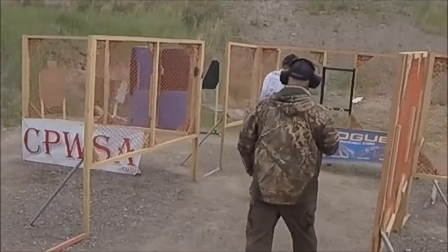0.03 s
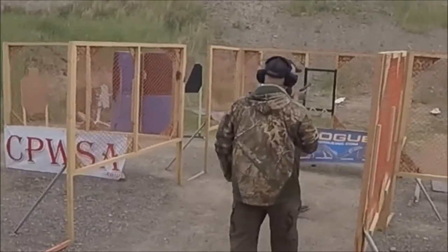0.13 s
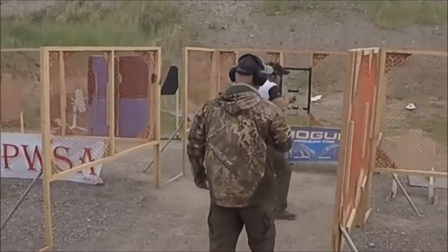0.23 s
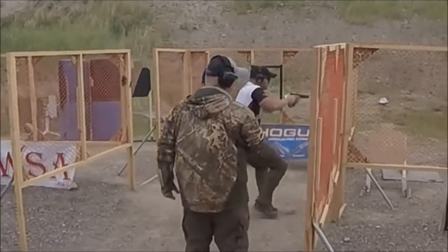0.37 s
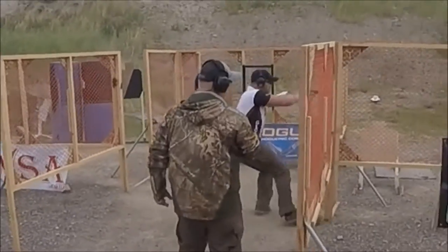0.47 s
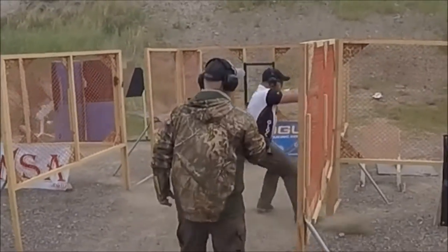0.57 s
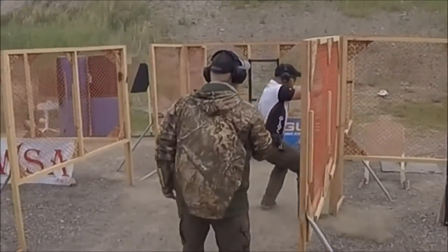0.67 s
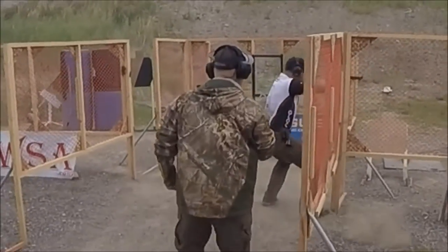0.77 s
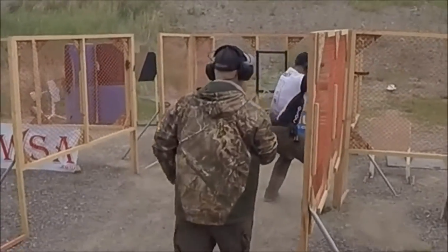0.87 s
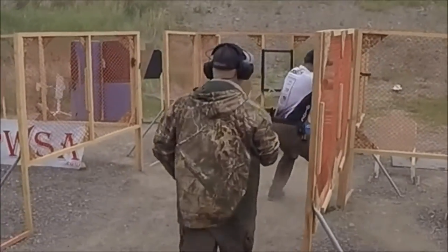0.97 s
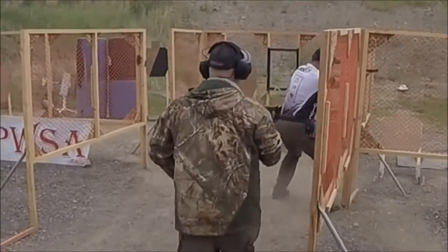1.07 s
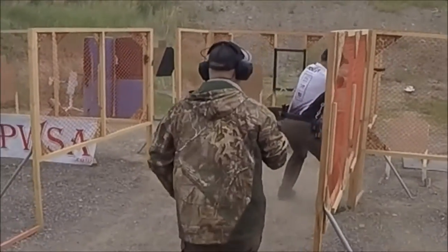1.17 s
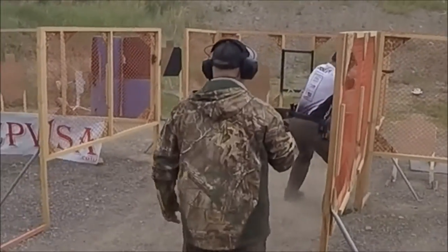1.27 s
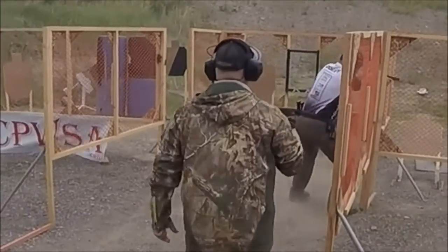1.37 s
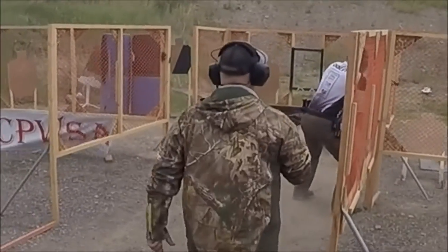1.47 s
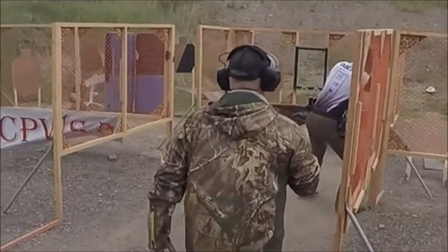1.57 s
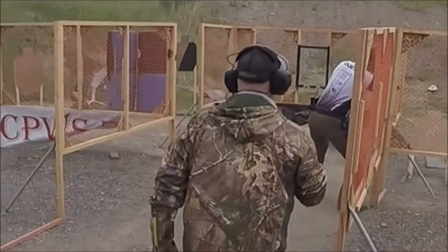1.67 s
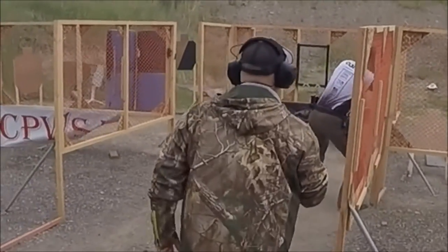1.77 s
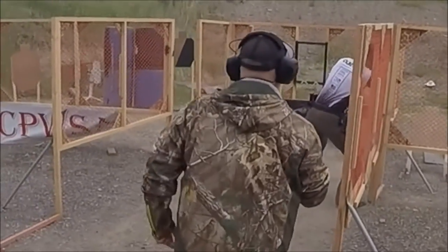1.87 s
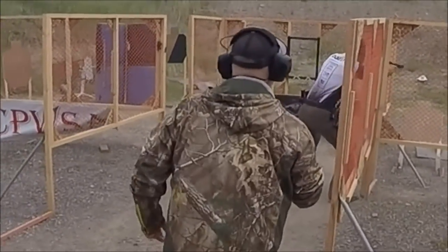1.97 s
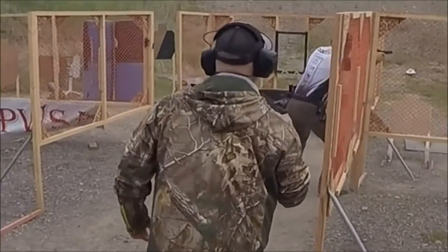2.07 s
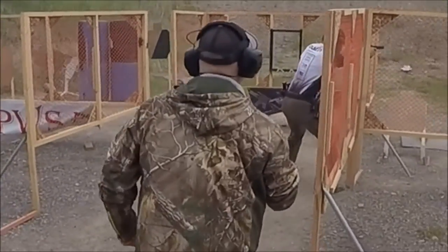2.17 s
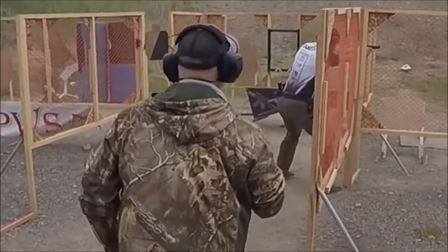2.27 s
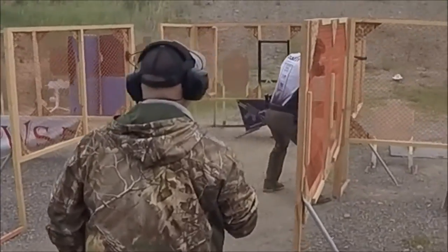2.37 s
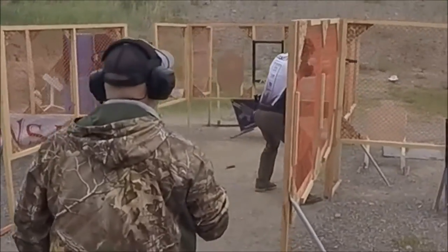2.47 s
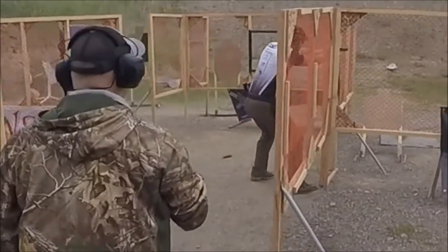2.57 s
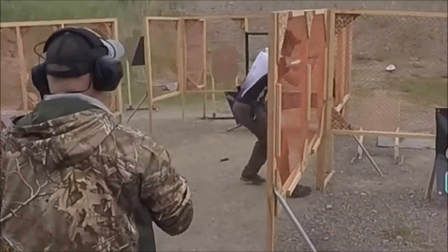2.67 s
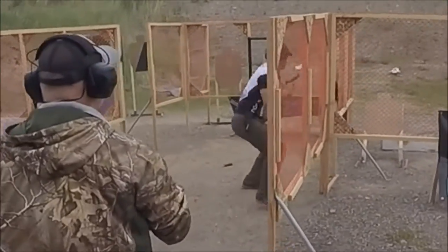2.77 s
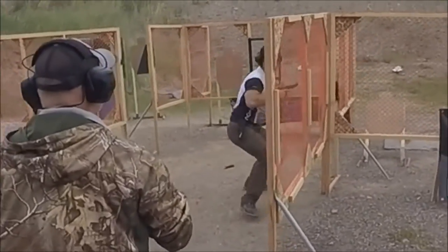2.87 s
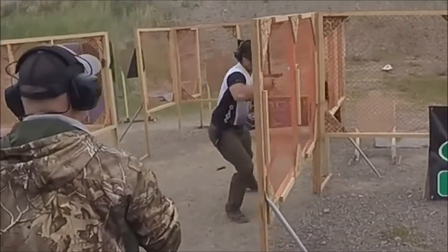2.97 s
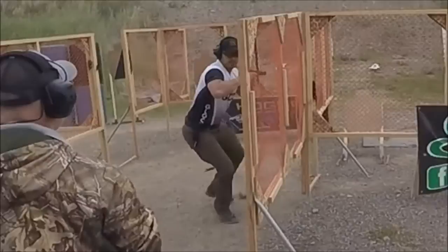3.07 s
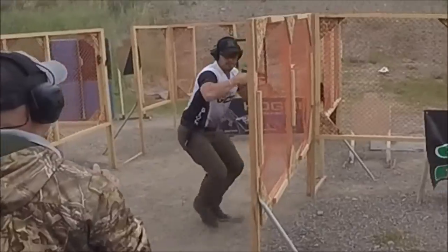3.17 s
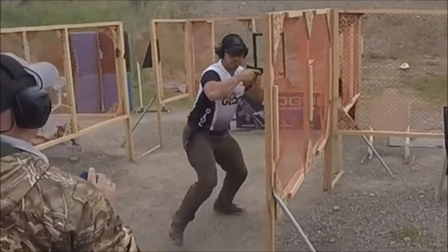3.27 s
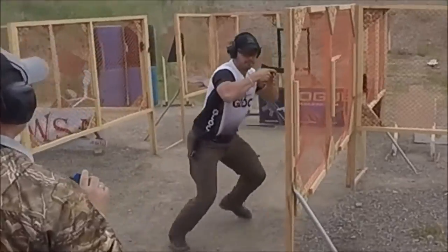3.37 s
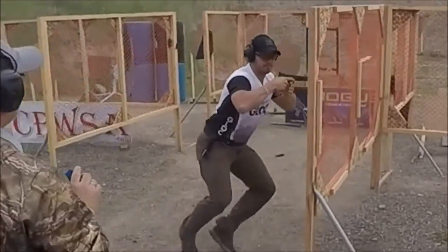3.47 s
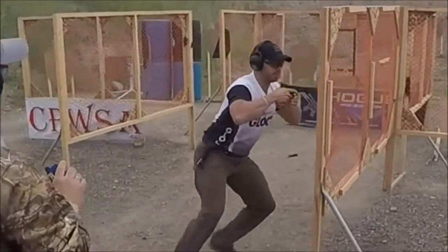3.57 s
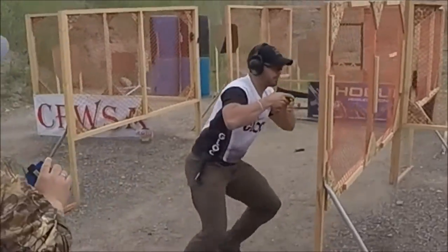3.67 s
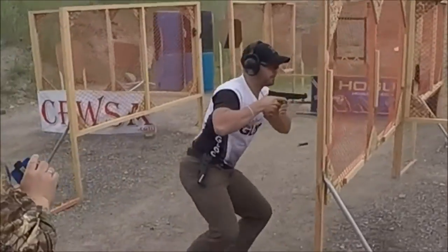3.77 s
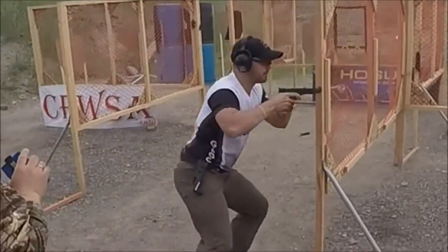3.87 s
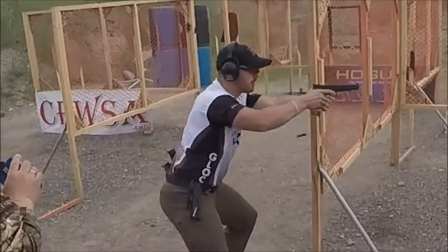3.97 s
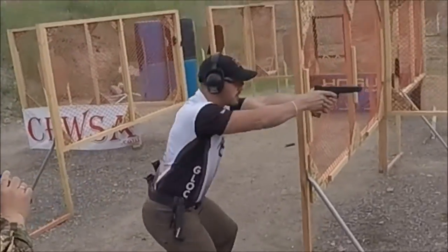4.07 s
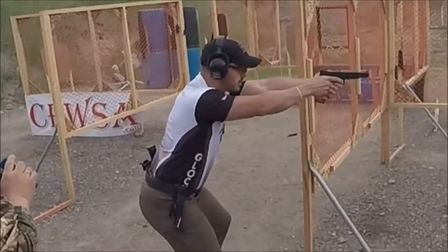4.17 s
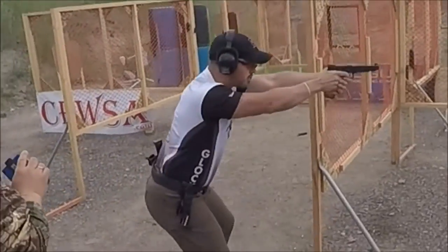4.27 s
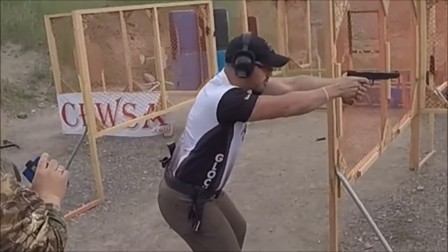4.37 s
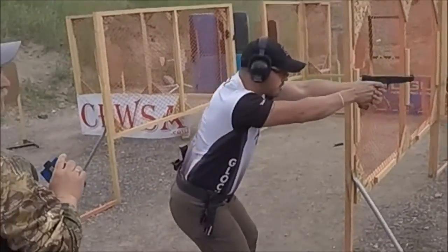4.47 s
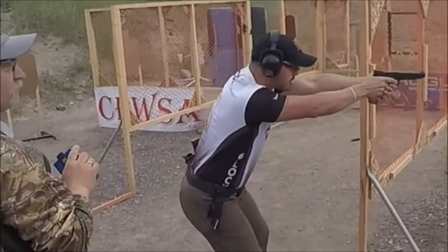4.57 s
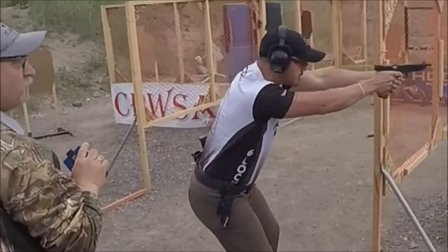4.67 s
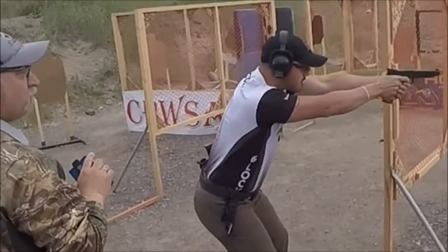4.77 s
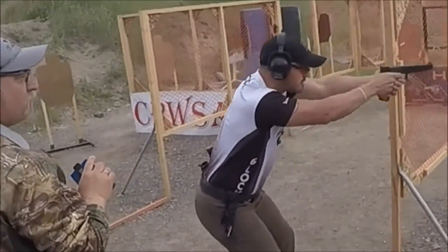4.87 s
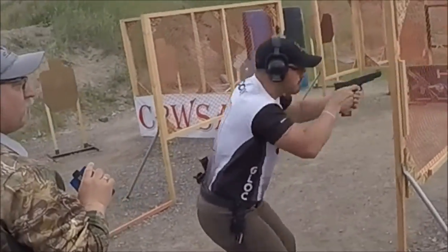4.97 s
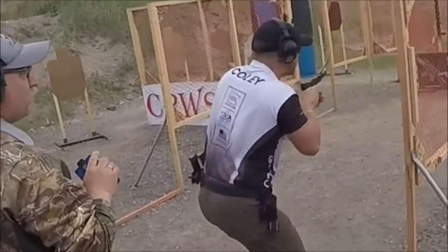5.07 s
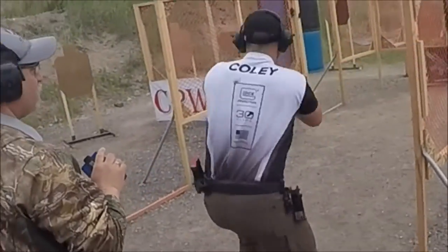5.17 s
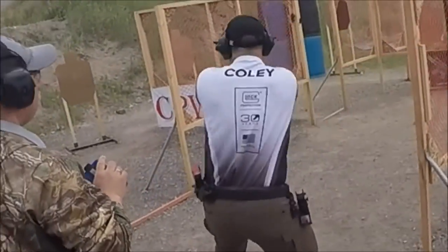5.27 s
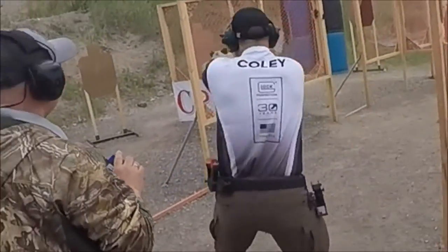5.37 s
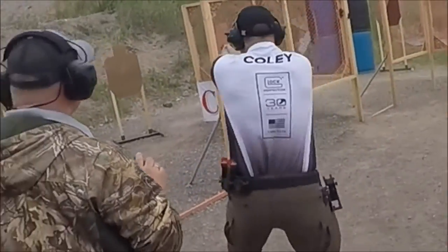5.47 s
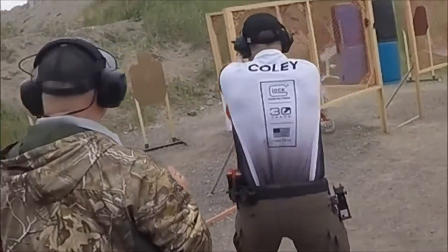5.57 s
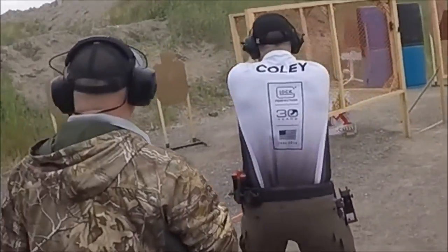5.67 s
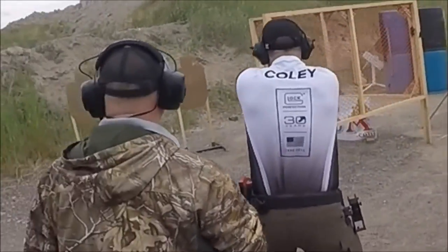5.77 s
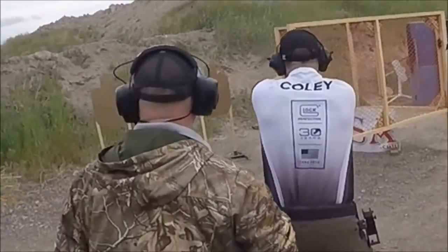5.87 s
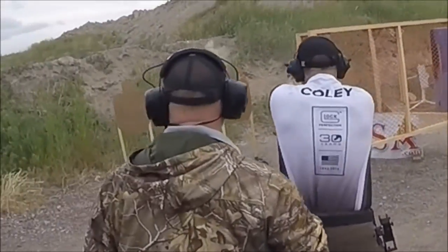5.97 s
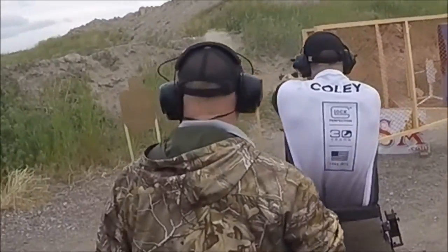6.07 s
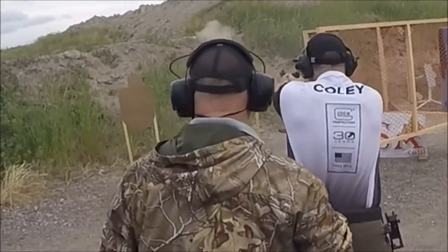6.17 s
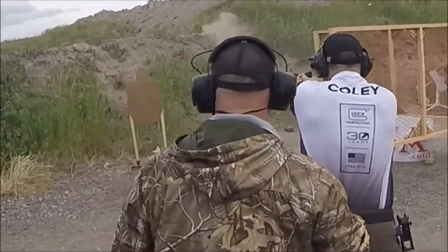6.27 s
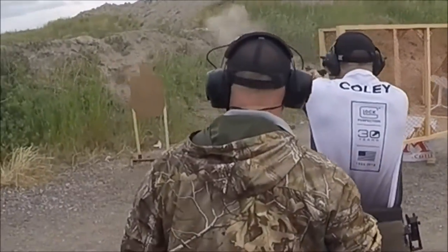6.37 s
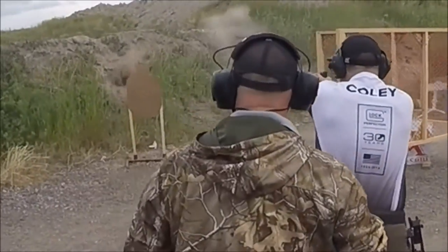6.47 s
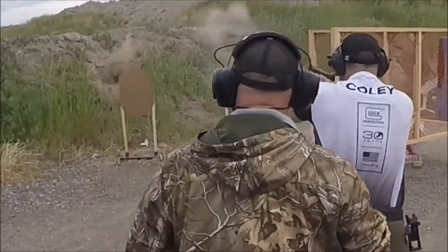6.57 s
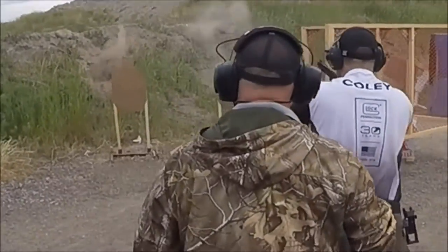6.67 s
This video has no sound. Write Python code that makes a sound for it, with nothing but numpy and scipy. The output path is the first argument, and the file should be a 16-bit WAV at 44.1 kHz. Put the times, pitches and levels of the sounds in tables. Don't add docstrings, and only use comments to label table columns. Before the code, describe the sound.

In an open gravel bay with board walls and earth banks, low wind rumble and gritty steps lead into harsh, overloading pistol fire: three shots, two pairs, then after a gusty lull two volleys of four. Short dull echoes crowd each crack, and a thin tail rolls off the hills. Background hiss and wind sink after each shot and creep back; tiny brass cases ring on stones.

```python
import sys
import numpy as np
from scipy import signal
from scipy.fft import rfft, irfft
from scipy.io import wavfile
from scipy.ndimage import uniform_filter1d

SR = 44100
rng = np.random.default_rng(int(sys.argv[2]) if len(sys.argv) > 2 else 0)


def dump_mix(stems):
    frames = np.atleast_2d(stems).T
    limited = np.clip(frames, -1, 1)
    pcm = np.round(limited * 32767).astype(np.int16)
    wavfile.write(sys.argv[1], SR, pcm)


def elevation(decibels):
    levels = np.asarray(decibels, float)
    return 10 ** (levels / 20)


N = 297230


def rms_one(x):
    return x / np.sqrt(np.mean(x ** 2) + 1e-20)


def peak_one(x):
    return x / np.max(np.abs(x))


def colour(x, spectrum):
    hz, level_db = np.transpose(spectrum)
    grid = np.fft.rfftfreq(8192, 1 / SR) + 1
    cepstrum = irfft(np.log(elevation(np.interp(np.log(grid), np.log(hz), level_db))))
    cepstrum[1:4096] *= 2
    cepstrum[4097:] = 0
    response = irfft(np.exp(rfft(cepstrum)))
    return signal.fftconvolve(x, response / np.sqrt(np.sum(response ** 2)))[:len(x)]


def drift(rate, size):
    r = np.exp(-2 * np.pi * rate / SR)
    walk = signal.lfilter([1], [1, -2 * r, r * r], rng.standard_normal(size + 9000))
    return rms_one(walk[9000:])


def low_pass(x, hz):
    return signal.sosfilt(signal.butter(4, np.clip(hz, 50, 19000), fs=SR, output="sos"), x)


def add(track, s, sound):
    at = round(s * SR)
    track[at:at + len(sound)] += sound[:N - at]


def swell(s, spread):
    return np.exp(-((np.arange(N) / SR - s) / spread) ** 2)


# (time [s], strength [dB], turbulence [dB])
GUSTS = [(0, -27.5, 1.5), (.28, -29.5, -12), (.56, -23, -3.5), (.95, -41, 12), (1.452, -52, 2.5),
         (1.97, -38, 7), (2.14, -26.5, -3), (2.97, -28, -1.5), (3.07, -40, 3), (3.6, -37, 0),
         (3.7, -23, -14), (3.82, -20, 2.5), (4.198, -9.5, 3), (4.62, -23, -10.5), (4.95, -44, 12.5),
         (5.26, -31.5, 3.5), (5.57, -30.5, 14.5), (5.85, -40.5, 2.5)]
# (frequency [Hz], density [dB])
RUMBLE_SPECTRUM = [(8.8, -13.5), (15, 8), (57, 6.5), (300, -20.5), (390, -63.5), (660, -120)]
BUFFET_SPECTRUM = [(71, -37), (120, -0.5), (189, -6), (334, -10), (371, -10.5), (520, -19.5), (680, -37.5),
                   (1140, -120)]
WHOOSH_SPECTRUM = [(260, -24.5), (450, -4), (534, -1), (587, -5), (910, -2.5), (1390, -23.5), (1470, -26),
                   (2040, -27.5), (2660, -30), (3500, -42.5), (5200, -47.5), (7700, -79.5)]
# (time [s], peak level [dB])
EDDY_POPS = [(2.113, -24.5), (2.294, -33), (3.671, -45), (3.807, -14), (3.846, -9), (3.975, -14),
             (4.101, -5), (4.179, -9), (4.282, -3), (5.233, -27), (5.293, -28)]


def wind(since, step_db):
    s, strength_db, roughness_db = np.transpose(GUSTS)
    t = np.arange(N) / SR
    gust_db, turbulence_db = np.interp(t, s, strength_db), np.interp(t, s, roughness_db)
    above_mean_db = gust_db + 26.5
    duck_db = uniform_filter1d(5 * np.exp(-since / 0.19), size=400)
    ambience_db = -57.5 - 36.5 * np.exp(-since / 0.25)
    rumble_db = gust_db - duck_db
    buffet_db = -41 + 1.555 * above_mean_db + turbulence_db - duck_db
    whoosh_db = -55.5 + 2.094 * above_mean_db + turbulence_db - duck_db
    whoosh_level = elevation(whoosh_db) + elevation(ambience_db) + elevation(step_db + 6.5)

    lumps_db, flicker = 2.0 * drift(24, size=N), drift(83, size=N)
    rumble = rms_one(colour(rng.standard_normal(N), RUMBLE_SPECTRUM) * elevation(lumps_db))
    buffet = rms_one(colour(rng.standard_normal(N) * elevation(lumps_db + 0.82 * flicker), BUFFET_SPECTRUM))
    whoosh = rms_one(colour(rng.standard_normal(N) * elevation(lumps_db + 2.8 * flicker), WHOOSH_SPECTRUM))
    out = elevation(rumble_db) * rumble + elevation(buffet_db) * buffet + whoosh_level * whoosh

    t = np.arange(SR // 20) / SR
    pop = np.cos(2 * np.pi * 160 * t) * np.exp(-t / 0.0044) * np.minimum(t / 0.00026, 1)
    pop = low_pass(pop, 1000)
    for s, peak_db in EDDY_POPS:
        add(out, s, elevation(peak_db) * pop)
    return out


# (time [s], level [dB], spread [s])
STEPS_ON_GRAVEL = [(0, -52.5, 0.057), (.42, -56.5, 0.063), (.49, -47, 0.026), (.57, -53.5, 0.057),
                   (.75, -62.5, 0.14), (2.07, -56.5, 0.072), (2.33, -56, 0.042), (2.799, -57.5, 0.15),
                   (3.11, -70, 0.0097), (3.29, -60, 0.023), (3.429, -62.5, 0.044), (3.58, -60, 0.04),
                   (3.83, -53.5, 0.17), (4.15, -51.5, .13), (4.42, -60.5, 0.073), (5.15, -67.5, 0.098),
                   (6.06, -65.5, 0.16), (6.6, -56, 0.068)]


def step_level():
    return 20 * np.log10(elevation(-72) + sum(elevation(db) * swell(s, spread) for s, db, spread in STEPS_ON_GRAVEL))


# (frequency [Hz], density [dB])
GRAVEL_SPECTRUM = [(710, -33), (1200, -1), (1660, -4), (2110, -3), (2890, -10.5), (5180, -18), (6580, -19),
                   (14700, -41), (15500, -39), (16000, -51.5)]


def gravel(step_db):
    grain_db, grains_per_s = 3.0, 7000
    sizes = elevation(grain_db * np.minimum(rng.exponential(1, N), 5)) * rng.choice([-1, 1], N)
    chance = grains_per_s * elevation(grain_db * drift(20, size=N)) / SR
    grains = sizes * (rng.random(N) < chance)
    return elevation(step_db) * rms_one(colour(grains, GRAVEL_SPECTRUM))


def electronics(since):
    whine_hz, wide_open_s, returns_db_per_s = 12620, 1.7, 18
    hiss = rms_one(np.diff(rng.standard_normal(N + 1)) * elevation(3.1 * drift(15, size=N)))
    whine = np.sin(2 * np.pi * whine_hz * np.arange(N) / SR)
    level_db = -79.5 - returns_db_per_s * np.maximum(wide_open_s - since, 0)
    return elevation(level_db) * (whine + elevation(4) * hiss)


# (time [s], peak level [dB], length [s])
STONES_AND_SCUFFS = [(0.0074, -35, 0.01), (0.1726, -37, 0.023), (0.199, -31.5, 0.013), (0.226, -41, 0.012),
                     (0.23, -50, 0.061), (0.352, -48, 0.021), (0.387, -38, 0.01), (0.404, -48, 0.011),
                     (0.472, -50, 0.022), (0.477, -42, 0.0065), (0.502, -54, 0.0089), (0.607, -69, 0.014),
                     (0.653, -43, 0.012), (1.6544, -53, 0.011), (2.311, -40.5, 0.0074),
                     (3.108, -55.5, 0.0081), (3.2394, -54, 0.011), (3.277, -50, 0.014),
                     (3.412, -56.5, 0.016), (3.533, -61.5, 0.017), (3.587, -42.5, 0.0088),
                     (3.672, -52, 0.013), (3.72, -42, 0.011), (3.734, -48, 0.01), (3.894, -38.5, 0.0091),
                     (4.013, -42, 0.015), (4.161, -31.5, 0.02), (4.213, -34, 0.01), (5.642, -53.5, 0.012),
                     (6.627, -46.5, 0.0099)]
# (frequency [Hz], density [dB])
SCUFF_SPECTRUM = [(470, -37.5), (800, 3), (2070, -15), (4080, -14), (5180, -13.5), (7360, -24.5),
                  (7930, -28), (14500, -33.5), (15400, -30.5), (16000, -41)]


def stones():
    out, t = np.zeros(N), np.arange(SR // 4) / SR
    for s, peak_db, length in STONES_AND_SCUFFS:
        scrape = rng.standard_normal(len(t)) * np.exp(-t / length) * np.minimum(t / 0.0065, 1)
        add(out, s, elevation(peak_db - 2.5) * colour(scrape, SCUFF_SPECTRUM))
    return out


# (time [s], pitch [Hz], level [dB], 60 dB decay [s])
BRASS_CASES = [(.525, 7100, -62, .06), (.545, 7600, -58, .05), (0.589, 11100, -58, 0.15),
               (0.649, 11500, -59, .1), (3.07, 8050, -70.5, 0.11), (3.64, 9000, -66, 0.051),
               (3.76, 11400, -66, .08), (3.86, 13900, -60, .06), (3.97, 11500, -61, .1),
               (3.99, 13800, -58, 0.12), (3.99, 7600, -62, .08), (4.132, 11800, -54, .25),
               (5.46, 7430, -67.5, .06), (5.50, 7650, -69, .06), (5.649, 7750, -67.5, .07)]


def brass():
    out, t = np.zeros(N), np.arange(SR // 4) / SR
    beat = 1 + .5 * np.sin(2 * np.pi * 45 * t)
    for s, hz, level_db, t60 in BRASS_CASES:
        ring = np.sin(2 * np.pi * hz * t) * beat * np.minimum(t / 0.0049, 1)
        add(out, s, elevation(level_db - 60 * t / t60) * ring)
    return out


# (time [s], wall echo [dB], overload [dB], near scatter [dB], low swing [dB])
PISTOL_SHOTS = [(0.711, 6, 7.5, -5.5, 1.5), (0.883, -8, 4, -11, -9), (1.128, 0.5, 1, -13, -20.5),
                (1.697, -1.5, 6, -8, -20), (1.87, -3, 2, -9.5, -20), (2.39, -1.5, 6, -9, -11.5),
                (2.611, -4.5, 9.5, -8.5, -24.5), (4.313, 6, 11, -3, -21), (4.505, 3, 6, -9, 0),
                (4.739, -1.5, 3.5, -12, -8.5), (4.926, -1.5, 2.5, -12, -17.5), (5.727, 6.5, 7, -7.5, -32),
                (5.947, 3, 5, -9.5, -16), (6.233, 3, 5.5, -9.5, -18.5), (6.449, 3, 4, -10.5, -23)]
# (frequency [Hz], density [dB])
NEAR_SPECTRUM = [(59, -32), (100, -3.5), (308, -4), (595, -4), (872, 1), (1010, -5), (1310, -13),
                 (1760, -13.5), (2270, -10), (3400, -23), (5080, -18.5), (6020, -31), (6840, -27.5),
                 (14100, -45.5), (16000, -57.5)]


def lead_in():
    out, length_s = np.zeros(N), .003
    for shot in PISTOL_SHOTS:
        noise = rng.standard_normal(round(length_s * SR))
        add(out, shot[0] - length_s, elevation(-33) * colour(noise, NEAR_SPECTRUM))
    return out


def housing(x):
    ring_hz, width_hz = 720, 380
    r = np.exp(-np.pi * width_hz / SR)
    return peak_one(signal.lfilter([1, 0, -1], [1, -2 * r * np.cos(2 * np.pi * ring_hz / SR), r * r], x))


# (frequency [Hz], density [dB])
BLAST_SPECTRUM = [(35, -27), (60, -7), (924, 6), (2050, -6.5), (2470, -7.5), (3120, -20), (5090, -18.5),
                  (7400, -40), (10000, -49.5), (10800, -50), (12700, -53), (13600, -51), (16000, -56.5)]


def blast(t, puff):
    crack_s, ball_s, ball_width_s = .0012, .0021, .00024
    growth = (t / crack_s) ** 2
    crack = signal.lfilter([1, -1], [1], puff[0]) * growth * np.exp(-growth)
    ball = np.exp(-((t - ball_s) / ball_width_s) ** 2) + 0.054 * puff[1] * np.exp(-t / 0.001)
    thump = 0.04 * peak_one(low_pass(ball, 430))
    ringing = peak_one(peak_one(colour(ball, BLAST_SPECTRUM)) + housing(ball) + thump)
    return elevation(-1.5) * peak_one(colour(crack, BLAST_SPECTRUM)) + ringing


def dying(noise, t, spectrum, t60):
    body = colour(noise, spectrum)
    bass = low_pass(body, 7800)
    return (bass + (body - bass) * elevation(-16 * t)) * elevation(-60 * t / t60)


SHOT_SPOT = [0, 0, 0, 1, 1, 2, 2, 3, 3, 3, 3, 4, 4, 4, 4]
SWING_SIGN = [-1, 1, 1, 1, 1, 1, 1, 1, 1, 1, 1, 1, 1, 1, 1]
# (delay [s], level [dB], dulled above [Hz], share ringing in the housing [0-1])
SPOT_ECHOES = [
    [(.0030, -3, 6000, 0.5), (.0240, -5.5, 1430, 0.5), (.0285, -6.5, 1477, 0), (.093, -27, 8800, 0),
     (.183, -34, 9170, 0), (.217, -43, 9200, 0.5)],
    [(.0020, -6.5, 5770, 0.6), (.0205, -6, 6830, 0), (.0225, 1, 1230, 0.9), (.0275, -15, 6000, .5),
     (.038, -11, 6040, 0), (.093, -22, 9000, .1), (.195, -34, 7040, .1)],
    [(.0030, -12, 6400, 0), (.0230, 5, 1520, 0.1), (.0280, -2, 4900, .5), (.0395, -2, 1187, 0.4),
     (.093, -18, 9000, 0)],
    [(.0041, -2, 7120, .1), (.0200, -1.5, 895, .2), (.017, -16.5, 8000, .1), (.040, -14, 1990, 0.6),
     (.094, -57, 9250, 0.4), (.186, -39, 9100, .1)],
    [(.0040, -3, 5200, 0), (.0324, 2, 1100, 0.7), (.054, -17, 6340, 0), (.056, -28.5, 265, .02),
     (.112, -36.5, 7100, .1), (.182, -33.5, 9000, 0)],
]
# (last wall [s], drop after it [dB], scatter 60 dB decay [s])
SPOT_BAY = [
    (0.038, -3, 0.21),
    (0.054, 0, 0.21),
    (0.046, -9, 0.27),
    (0.033, 0.5, 0.16),
    (0.069, -3, 0.23),
]
# (far tail [dB], hill answer delay [s], hill answer [dB], its spread [s])
SPOT_LAND = [
    (-34, .2, -51.5, 0.067),
    (-30.5, 0.16, -41, .06),
    (-27, 0.19, -50, 0.042),
    (-38, 0.21, -47.5, 0.014),
    (-32.5, 0.19, -50, 0.07),
]
# (frequency [Hz], density [dB])
FAR_SPECTRUM = [(88, -47.5), (150, -9.5), (254, 0), (328, -5.5), (524, -4.5), (790, -1.5), (1080, -12),
                (1450, -10), (1760, -13), (2140, -9.5), (3420, -20), (4860, -13), (5910, -20.5),
                (13700, -39), (16000, -77.5)]


def shots():
    clump_db, fresh_db, aim_s, aim_db, swing_s = 1.8, 3.5, .0002, 1.2, .014
    far_rise_s, far_t60_s = 0.046, 0.61
    t, out = np.arange(SR) / SR, np.zeros(N)
    place = rng.standard_normal((len(SPOT_ECHOES), 4, SR))
    clumps = [elevation(clump_db * drift(160, size=SR)) for spot in SPOT_ECHOES]
    patches = [elevation(clump_db * drift(30, size=SR)) for spot in SPOT_ECHOES]
    spot_before = [None] + SHOT_SPOT
    for shot, spot, before, sign in zip(PISTOL_SHOTS, SHOT_SPOT, spot_before, SWING_SIGN):
        s, echo_db, over_db, near_db, swing_db = shot
        noise = .86 * place[spot] + .5 * rng.standard_normal((4, SR))
        pulse = blast(t, noise[:2])
        sound = pulse * elevation(over_db)
        for k, (delay, level_db, dull_hz, ringing) in enumerate(SPOT_ECHOES[spot]):
            gain_db = over_db if k == 0 else echo_db
            lag = round((delay + aim_s * noise[0, k]) * SR)
            echo = (1 - ringing) * peak_one(low_pass(pulse, dull_hz)) + ringing * housing(pulse)
            sound[lag:] += elevation(level_db + gain_db + aim_db * noise[1, k]) * echo[:SR - lag]

        wall, drop_db, t60 = SPOT_BAY[spot]
        inside = elevation(drop_db * np.clip((t - wall) / .003, 0, 1) - 60 * t / t60)
        inside *= np.minimum(t / 0.0037, 1)
        sound += elevation(near_db) * clumps[spot] * inside * colour(noise[2], NEAR_SPECTRUM)

        far_db = SPOT_LAND[spot][0] + fresh_db * (spot != before)
        far = (1 - np.exp(-t / far_rise_s)) * dying(noise[3], t, FAR_SPECTRUM, far_t60_s)
        sound += elevation(far_db) * patches[spot] * far

        after = np.maximum(t - .006, 0)
        swing = np.sin(2.6 * np.log1p(after / 0.001)) * np.exp(-after / swing_s)
        sound -= sign * elevation(swing_db) * swing
        add(out, s, sound)
    return out


def hills():
    level = np.zeros(N)
    for shot, spot in zip(PISTOL_SHOTS, SHOT_SPOT):
        _, delay, level_db, spread = SPOT_LAND[spot]
        level += elevation(level_db) * swell(shot[0] + delay, spread)
    return level * rms_one(colour(rng.standard_normal(N), FAR_SPECTRUM) * elevation(1.8 * drift(30, size=N)))


def whistle():
    length_s, from_hz, to_hz = .09, 530, 450
    out, t = np.zeros(N), np.arange(round(length_s * SR)) / SR
    hz = from_hz + (to_hz - from_hz) * t / length_s
    tone = np.sin(np.pi * t / length_s) * np.sin(2 * np.pi * np.cumsum(hz) / SR)
    add(out, 3.045, elevation(-52) * tone)
    return out


def since_last_shot():
    t = np.arange(N) / SR
    fired = np.array([-1.3] + [shot[0] for shot in PISTOL_SHOTS])
    return t - fired[np.searchsorted(fired, t) - 1]


def scene():
    since, step_db = since_last_shot(), step_level()
    ground = gravel(step_db) + stones() + brass()
    firing = lead_in() + shots() + hills()
    return (wind(since, step_db) + ground + electronics(since) + firing + whistle())[None]


def band_limit(x):
    return signal.sosfilt(signal.butter(12, 16510, fs=SR, output="sos"), x)


def record(dry):
    knee, top_hz, ceiling = 6, 15400, .91
    clipped = dry / (1 + np.abs(dry) ** knee) ** (1 / knee)
    cut = signal.sosfilt(signal.cheby2(8, 25, top_hz + 600, fs=SR, output="sos"), clipped)
    return band_limit(ceiling * cut)


dry = scene()
out = record(dry)
dump_mix(out)
```